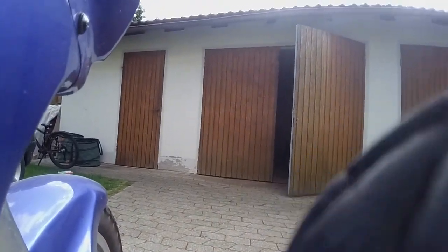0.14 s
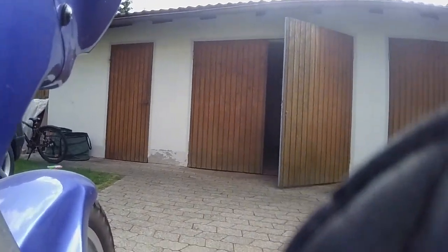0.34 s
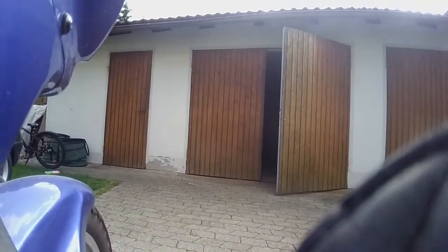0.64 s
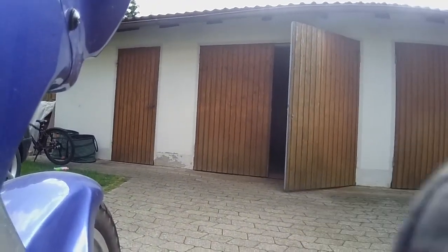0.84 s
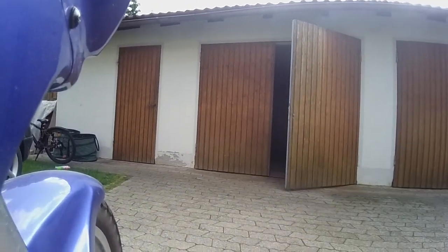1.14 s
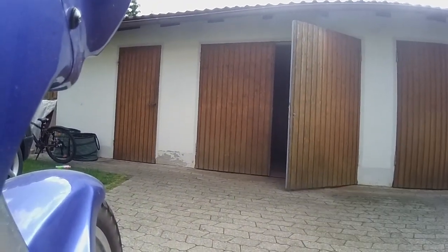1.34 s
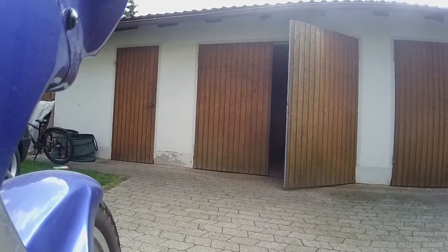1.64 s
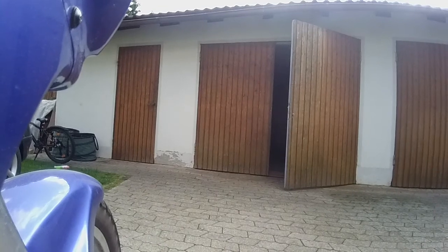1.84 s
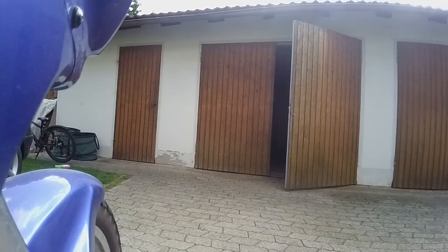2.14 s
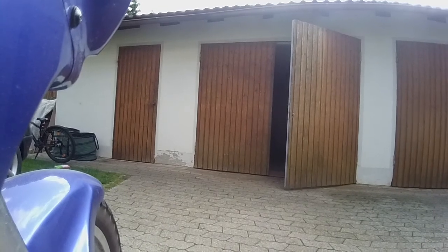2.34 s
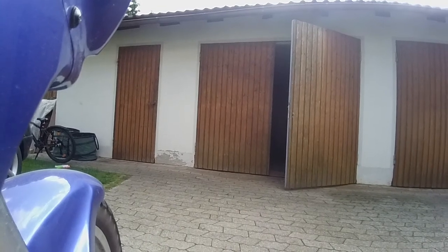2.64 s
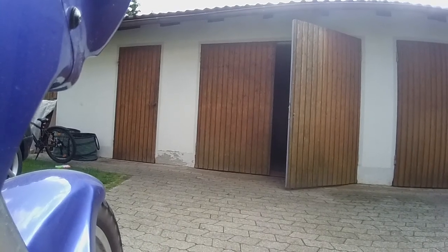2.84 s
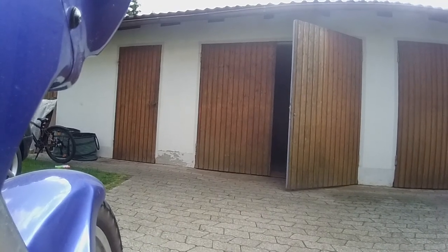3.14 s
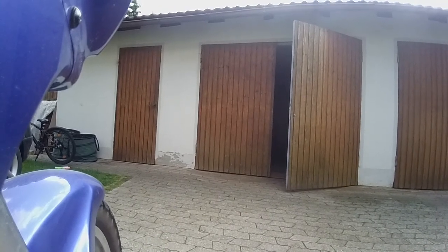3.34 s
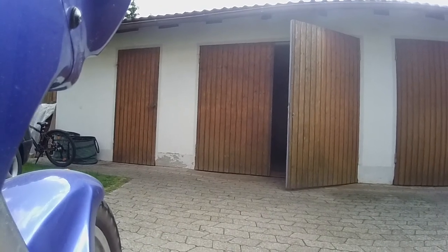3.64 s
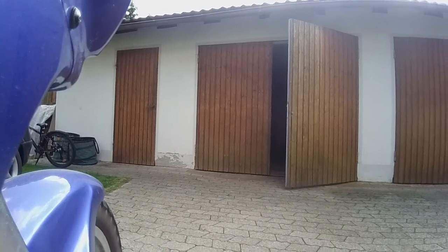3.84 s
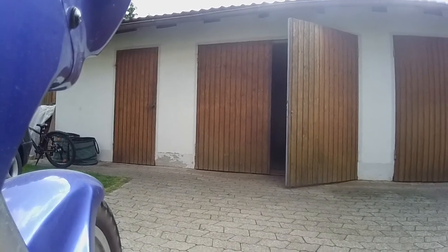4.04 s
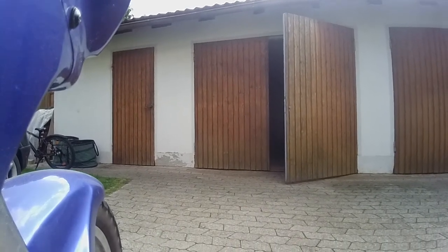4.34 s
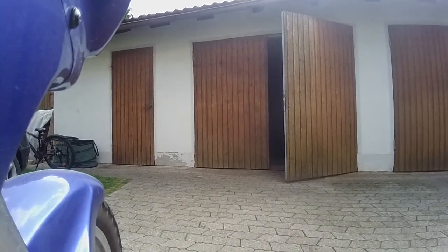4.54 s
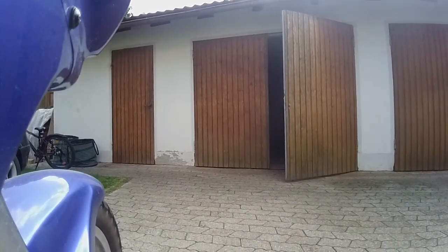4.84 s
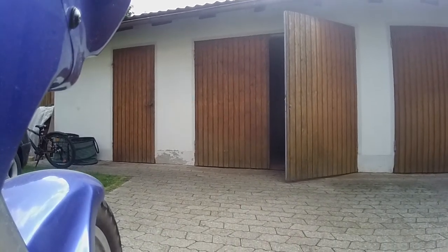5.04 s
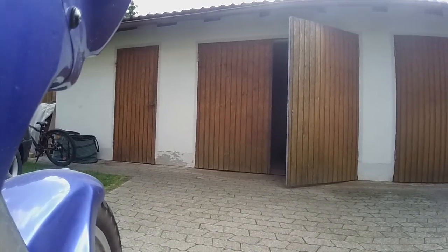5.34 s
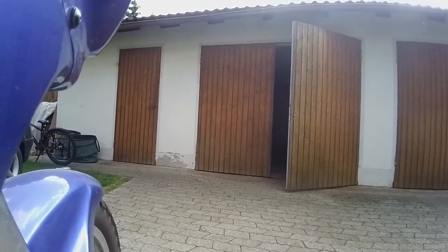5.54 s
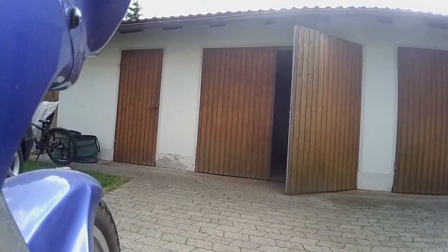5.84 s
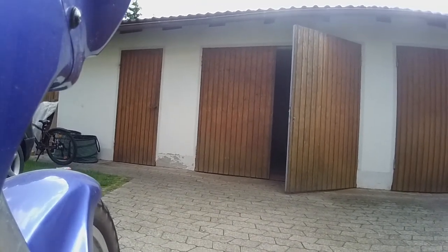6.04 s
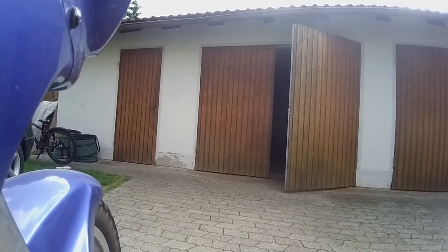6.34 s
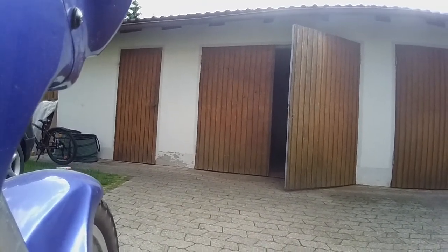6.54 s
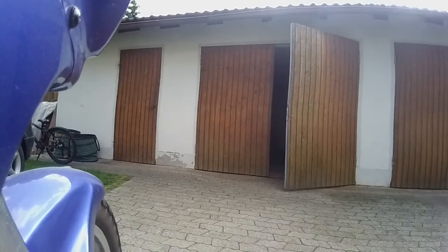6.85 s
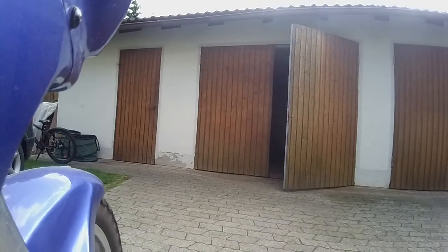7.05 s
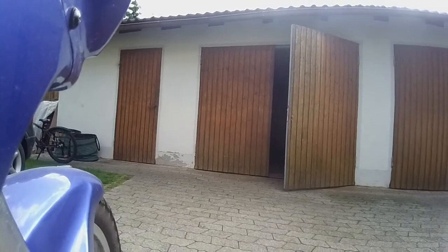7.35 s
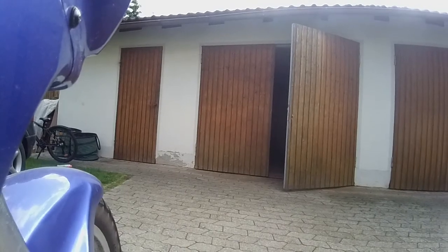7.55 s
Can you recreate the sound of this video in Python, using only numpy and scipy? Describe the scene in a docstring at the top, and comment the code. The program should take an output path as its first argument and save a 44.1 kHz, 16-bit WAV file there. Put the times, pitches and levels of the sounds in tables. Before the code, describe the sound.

A hand fumbles and bumps a camera case, a scooter frame clanks, the starter rasps, and the engine flares up, then settles into chattering idle.

```python
"""A paved courtyard: a small camera fixed low on a scooter is rubbed, pressed and knocked.
Stick-slip friction and taps excite its case; a finger now and then pops and seals its microphone port.
Blows ring the frame as decaying modes, and metal rasps and squeals at each turn of the starter.
The engine catches and sinks to idle: the faster it runs, the louder the camera chatters on its mount,
and at times the shaking chops the sound once a firing."""
import sys
import numpy as np
from scipy import signal
from scipy.fft import rfft, irfft
from scipy.io import wavfile
from scipy.ndimage import uniform_filter1d

SR = 44100
rng = np.random.default_rng(int(sys.argv[2]) if len(sys.argv) > 2 else 0)


def dump_mix(stems):
    """Bounce the given channels to the path in sys.argv[1] as a 16-bit WAV at rate SR."""
    frames = np.atleast_2d(stems).T  # one column per channel
    limited = np.clip(frames, -1, 1)  # hard clip at full scale
    pcm = np.round(limited * 32767).astype(np.int16)
    wavfile.write(sys.argv[1], SR, pcm)


N = 339570
TIME = np.arange(N) / SR  # s

# broad spectral envelope of the camera case, later scaled to unit power: (f/Hz, relative level/dB)
CASE_COLOUR = [(30, -34), (100, -14.5), (150, -14.5), (230, -4), (450, -2.5), (900, -2), (1500, -7),
               (2000, -3.5), (2600, -10.5), (3300, -14.5), (5000, -13.5), (7800, -20), (9000, -62.5)]
# broad spectral envelope of the scooter frame, later scaled to unit power: (f/Hz, relative level/dB)
FRAME_COLOUR = [(30, -28), (100, -14.5), (160, -34), (230, -1), (380, -6), (700, 2.5), (1100, 0),
                (1500, -5.5), (2800, -8.5), (3300, -15.5), (3900, -13.5), (5000, -20.5), (7500, -26.5),
                (9000, -47)]
# resonances of the frame: (f/Hz, width/Hz, lift/dB)
FRAME_RESONANCES = [(217.8, 16, 6.7), (451, 40, 5.9), (632, 34, 8.1), (960, 120, 2.2), (2000, 130, 6.3),
                    (2660, 90, 8), (3815, 95, 8.8), (3864, 34, 2)]
# a finger presses the port with a pop and keeps it shut:
# (t/s, peak level/dB, low-pass corner of the spike f/Hz, rebound relative to the peak/dB, held/s)
PORT_PRESSES = [(.457, -4, 6100, -27, 0.04), (.539, -10.5, 1500, -1.5, 0.033),
                (.571, -23.5, 1200, -10, 0.0044), (.682, -8, 2600, -4, 0.037), (.739, -13, 1800, -5, 0.12),
                (.858, -7.5, 2560, -2.5, 0.028), (1.197, -6, 890, -12.5, .021)]


def undb(db):
    """Amplitude gain from a level in decibels, by the 20 log definition."""
    return 10 ** (np.asarray(db) / 20)


def unit(x):
    """Normalisation to a root-mean-square amplitude of 1."""
    return x / np.sqrt(np.mean(x ** 2))


def add(track, s, x):
    """Linear superposition of a sound on a track from time s."""
    i = max(0, int(s * SR))
    track[i:i + len(x)] += x[:max(0, N - i)]


def filt(x, hz, kind, order=2):
    """Butterworth filtering: a maximally flat passband."""
    return signal.sosfilt(signal.butter(order, hz, kind, fs=SR, output="sos"), x)


def fade(t60):
    """Exponential decay, linear in decibels, by 60 dB in t60 seconds."""
    return undb(np.linspace(0, -60, int(t60 * SR) + 2))


def wobble(hz):
    """Low-pass random process of spread 1 that changes about hz times a second."""
    return unit(filt(rng.standard_normal(N), hz, "low"))


def body(x, colour, peaks=(), tilt_db=0, size=4096):
    """Source-filter principle: a force drives a minimum-phase body of unit power gain."""
    hz = np.maximum(np.fft.rfftfreq(size, 1 / SR), 1)
    knots, levels = np.transpose(colour)
    envelope_db = np.interp(np.log(hz), np.log(knots), levels)
    # the tilt, in dB per octave, acts above 550 Hz
    db = envelope_db + tilt_db * np.log2(np.maximum(hz, 550))
    for centre, width, lift in peaks:
        db = db + lift / (1 + (2 * (hz - centre) / width) ** 2)
    # folding the cepstrum makes the body ring only after it is pushed
    cepstrum = irfft(np.log(undb(db)))
    cepstrum[1:size // 2] *= 2
    cepstrum[size // 2 + 1:] = 0
    response = irfft(np.exp(rfft(cepstrum)))
    return signal.fftconvolve(x, response / np.linalg.norm(response))[:N]


def ring(modes, split=0.01):
    """Modal superposition: one second of freely decaying modes, each a close pair that beats."""
    t = TIME[:SR]
    out = np.zeros(SR)
    for hz, db, t60 in modes:
        partner_hz = hz * (1 + split * rng.standard_normal())
        pair = np.sin(2 * np.pi * hz * t) + .5 * np.sin(2 * np.pi * partner_hz * t)
        out += undb(db) * np.exp(-np.log(1000) * t / t60) * pair
    return out / np.sqrt(2)


def crack(t60, rise_s=0.0011):
    """Impact excitation: rattling contact as decaying noise; the parts take a moment to meet."""
    decay = fade(t60)
    decay = decay * (1 - np.exp(-TIME[:len(decay)] / rise_s))
    return unit(rng.standard_normal(len(decay))) * decay


def friction(strokes, crest, swell_db, bend, colour, peaks, grain_db, catch_db, catch_hz, song):
    """Stick-slip friction: tiny slips, bunched as surfaces catch, drive a body under a song's tone."""
    bunching_db = grain_db * wobble(2700) + catch_db * wobble(catch_hz)
    slips = unit(rng.standard_normal(N) * undb(bunching_db))
    out = np.zeros(N)
    for start, length, db, tilt in strokes:
        during = (TIME >= start) & (TIME < start + length)
        progress = (TIME[during] - start) / length
        # 0 at the crest, 1 at both ends; the crest is round if bend > 1, pointed below
        ease = np.interp(progress, [0, np.clip(crest, 0, 1), 1], [1, 0, 1])
        pressure = undb(db - swell_db * ease ** bend)
        add(out, start, body(unit(slips[during]) * pressure, colour, peaks, tilt))
        add(out, start, song[during] * pressure)
    return out


def churn(x, depth_db, hz):
    """Band-wise amplitude modulation: the contact point moves, so each band swells and fades alone."""
    out = 0
    for edge in np.geomspace(500, 6000, num=7):
        low = signal.sosfiltfilt(signal.butter(4, edge, fs=SR, output="sos"), x)
        out = out + low * undb(depth_db * wobble(hz))
        x = x - low
    return out + x


def air(air_db=-58, rumble_db=-61):
    """Broadband noise: a faint outdoor hush, and a low rumble while the hand rests on the camera."""
    # spectral envelope of the hush, later scaled to unit power: (f/Hz, relative level/dB)
    yard_colour = [(30, -24), (60, -21.5), (90, -12), (150, -11.5), (260, -4.5), (650, -1.5), (1000, -1.5),
                   (1500, -8.5), (3000, -11), (8000, -18.5), (9000, -46)]
    hush = body(rng.standard_normal(N), yard_colour) * undb(air_db + 1.2 * wobble(14))
    resting = np.interp(TIME, [3.5, 3.6], [1, 0])
    rumble = unit(filt(rng.standard_normal(N), [12, 36], "band")) * resting
    return hush + undb(rumble_db) * rumble


def courtyard(x, damp_hz=3500):
    """Diffuse reverberation: convolution with the echo of walls and wooden doors, dull in the treble."""
    t60_s, wet_db = 1, -28.5
    tail = filt(crack(t60_s), [170, damp_hz], "band", order=1)
    tail[:SR // 60] = 0  # silent until the first reflections
    return undb(wet_db) * signal.fftconvolve(x, tail / np.linalg.norm(tail))[:N]


def rattles(tilt_db=-1.2):
    """Random impacts: loose parts touch the frame lightly at uneven moments while the scooter rocks."""
    start, end = 4.95, 6.08  # s
    per_s, level_db, scatter_db, t60_s = 24, -41.5, 3.5, 0.1
    force = np.zeros(N)
    for when, size in rng.random((int(per_s * (end - start)), 2)):
        touch_db = level_db + scatter_db * (2 * size - 1)
        add(force, start + when * (end - start), undb(touch_db) * crack(t60_s))
    return body(force, FRAME_COLOUR, FRAME_RESONANCES, tilt_db)


def frame():
    """Impulsive modal excitation: blows rattle the panels and ring the frame; the stand's spring twangs."""
    # blows on the scooter's frame: (t/s, level/dB, brightness/(dB/octave), t60/s)
    knocks = [(4.355, -46, -7, .15), (4.557, -42, -7, 0.076), (4.666, -19.5, 2.5, 0.13),
              (4.736, -18, 1, 0.088), (4.755, -3.5, 1, 0.14), (4.774, -2, -3, 0.13),
              (4.834, -4.5, 0, 0.098), (4.893, -14, -3, 0.06), (5.164, -31.5, -2, .12),
              (5.275, -21, -2, .062), (5.647, -29, -4.5, 0.093), (6.733, 1, 6.5, 0.031),
              (7.204, -10, -5, 0.05), (7.348, -9.5, -2.5, .12), (7.41, -3.5, -.7, .12),
              (7.494, -5.5, -3, .12), (7.575, -10.5, -3, 0.067), (7.627, -1, -7, 0.018)]
    # ringing modes of the frame: (f/Hz, relative level/dB, t60/s)
    frame_modes = [(93.4, -26.5, 0.66), (213, -11.5, .55), (446, -15, .45), (618, -9, 0.56),
                   (1314, -22, 0.32), (2605, -18, 1), (2900, -30, .4)]
    # ringing modes of the stand's spring: (f/Hz, relative level/dB, t60/s)
    spring_modes = [(584, -13, .16), (980, 3.5, 0.81), (1120, -6, 0.19), (1484, 1, 0.26), (1960, 4, 0.16),
                    (2612, 0.5, 0.33), (3790, -12, 0.41), (4570, 4.5, 0.12), (5350, -6, .15)]
    twang_s, twang_db = 4.664, -23
    # ringing left by a blow of this length; a longer one leaves more
    ring_db, ring_t60_s = -16.5, 0.094
    out, tubes = np.zeros(N), ring(frame_modes)
    add(out, twang_s, undb(twang_db) * ring(spring_modes))
    for s, db, tilt, t60 in knocks:
        add(out, s, undb(db) * body(crack(t60), FRAME_COLOUR, FRAME_RESONANCES, tilt))
        add(out, s, undb(db + ring_db) * t60 / ring_t60_s * tubes)
    return out


def stutter(count=7):
    """Stick-slip oscillation: a fingertip's evenly spaced slips, each louder and brighter than the last."""
    start_s, period_s, sliding_share = 1.225, .0186, 0.66
    first_db, growth_db, brighten_db = -44, 5, 0.35  # steps per slip: dB, and dB/octave
    return [(start_s + k * period_s, sliding_share * period_s, first_db + k * growth_db, k * brighten_db)
            for k in range(count)]


def hand():
    """Friction and impact on a plastic shell: the hand rubs and taps the camera case."""
    # strokes of the hand over the camera: (t/s, length/s, crest level/dB, brightness/(dB/octave))
    rubs = [(.148, 0.043, -32.5, -3), (.185, 0.09, -28, -1), (.257, .02, -20, -2.3),
            (.275, 0.083, -34, 0.8), (.364, .046, -34.5, 2), (.413, .016, -34, 4), (.44, .02, -44, 4),
            (.887, .042, -29, 2.5), (.936, 0.17, -19, 1), (1.135, 0.016, -35, 0.5),
            (1.495, 0.042, -22.5, 0.5), (1.535, .07, -25, -1), (1.68, 0.22, -39, -1.5),
            (2.17, .14, -44.5, -1.5), (2.4, 0.4, -55, -0.5), (2.853, .095, -24, -1),
            (3.341, 0.038, -36.5, -2.5), (3.394, .236, -26, -2), (3.54, 0.15, -24.5, 1),
            (3.675, .11, -31, 0), (3.78, .105, -44.5, -5), (4.2, 0.26, -56, -1), (5.745, 0.059, -41, 0.2),
            (5.91, .12, -39.5, -3.5)]
    # taps on the case: (t/s, level/dB, brightness/(dB/octave))
    taps = [(.003, -20, -.5), (.149, -19.5, -3), (.296, -9.5, -1), (.654, -31, -3), (.808, -24, -2),
            (.907, -29, 8), (.914, -42, 18), (.946, -42, 12), (1.192, -13, -5), (1.496, -16, -.5),
            (1.52, -27, 10), (1.563, -12, .5), (2.314, -27, -4.5), (2.423, -35.5, -1.5), (2.501, -32, -8),
            (2.909, -3.5, .5), (3.342, -22, -4), (3.396, -19, -3.5), (3.868, -33, 1), (5.532, -29.5, 1.5)]
    # resonances of the case: (f/Hz, width/Hz, lift/dB)
    case_resonances = [(609, 58, 8.5), (1033, 155, 7.5), (2655, 120, 6), (2930, 270, 10), (3808, 276, 12.5),
                       (7050, 360, 11)]
    # a loose grip lets the hollow case groan under the rubbing: (t/s, level relative to the stroke/dB)
    groan_levels = [(3.33, -25), (3.4, -2.5), (3.55, 2.5), (3.62, -32)]
    groan_db = np.interp(TIME, *np.transpose(groan_levels))
    groan = unit(filt(rng.standard_normal(N), [570, 680], "band")) * undb(groan_db)
    # each stroke presses hardest at 0.53 of its length, 11 dB above its ends
    rubbing = friction(rubs + stutter(), 0.53, 11, 1.62, CASE_COLOUR, case_resonances,
                       grain_db=2.5, catch_db=1.34, catch_hz=100, song=groan)
    out = churn(rubbing, depth_db=1.4, hz=24)
    for s, db, tilt in taps:
        contact = crack(0.025, rise_s=0.00039)
        add(out, s, undb(db) * body(contact, CASE_COLOUR, case_resonances, tilt))
    return out


def port_pops(leak_hz=260, rebound_s=0.00202, thud_db=-33, thud_hz=900, thud_t60=.1):
    """Pressure transient: a spike leaks away, the membrane rebounds and rings, and the case thuds dully."""
    out = np.zeros(N)
    for s, db, hz, rebound_db, _ in PORT_PRESSES:
        spike = filt(filt(signal.unit_impulse(SR // 20), hz, "low"), leak_hz, "high", order=1)
        membrane_modes = [(1020, 1.0, 0.014), (598, -11.0, 0.022), (2460, -12, 0.012)]
        rebound = ring(membrane_modes, split=0.28)
        thud = filt(body(crack(thud_t60), CASE_COLOUR), thud_hz, "low", order=4)
        add(out, s, undb(db) * spike / spike.max())
        add(out, s + rebound_s, -undb(db + rebound_db) * rebound)
        add(out, s, undb(db + rebound_db + thud_db) * thud)
    return out


def starter(waver=0.02498, flicker_db=1.5):
    """Friction-driven tone: metal rasps and squeals unsteadily, its harmonics flickering separately."""
    # turns of the starter, each a surge of rasping: (t/s, length/s, crest level before a 3 dB cut/dB)
    rasps = [(6.129, .125, -15), (6.218, .18, -5), (6.378, .095, -11.5), (6.46, .125, -13.5),
             (6.57, .135, -5.5)]
    # spectral envelope of the rasping metal, later scaled to unit power: (f/Hz, relative level/dB)
    starter_colour = [(30, -38), (140, -22), (230, -7.5), (380, -9), (800, -2), (1500, -6.5), (2900, -11.5),
                      (3280, -27.5), (3700, -7.5), (4300, -29), (5600, -22), (6300, -44), (7000, -25),
                      (9000, -79)]
    # resonances of the rasping metal: (f/Hz, width/Hz, lift/dB)
    starter_resonances = [(627, 19, 10.5), (942, 155, 8.2), (1940, 84, 17.1), (2642, 110, 12),
                          (3720, 150, 8.1), (4016, 140, 13.6), (4600, 160, 15)]
    # course of the squeal, about which its pitch wavers: (t/s, f/Hz)
    squeal_pitch = [(6.3, 969), (6.36, 742.5), (6.41, 934), (6.62, 967), (6.67, 885)]
    # harmonics of the squeal from the fundamental up: (mean level relative to the rasp/dB)
    harmonics_db = [-3, -14.5, -16, -21]
    hz = np.interp(TIME, *np.transpose(squeal_pitch)) * (1 + waver * wobble(110.3))
    phase = 2 * np.pi * np.cumsum(hz) / SR
    squeal = np.zeros(N)
    for k, db in enumerate(harmonics_db, 1):
        squeal += undb(db + flicker_db * wobble(30)) * np.sin(k * phase)
    # a harder turn is brighter: 3 dB/octave at 0 dB, and 0.34 dB/octave less per dB below
    turns = [(s, length, db, 3 + 0.34 * db) for s, length, db in rasps]
    # each turn peaks at 0.58 of its length, 17.5 dB above its ends
    rasp = friction(turns, 0.58, 17.5, 0.85, starter_colour, starter_resonances,
                    grain_db=2.0, catch_db=1.5, catch_hz=112, song=squeal)
    return churn(rasp, depth_db=2.5, hz=25.2) / np.sqrt(2)


def port_ticks(contact, per_s=700, scatter_db=0.5):
    """Random impulse train: hard bounces snap the port's membrane, and die away as the engine settles."""
    start_s, hold_s, level_db, fall_db_per_s = 6.735, 0.3, -24, 122
    # membrane's spectral envelope: (f/Hz, relative level/dB)
    membrane = [(1000, -7.0), (5000, -3.5), (7100, 12.0), (8000, 4.5), (9000, -57)]
    hardness = np.sqrt(contact / uniform_filter1d(contact, SR // 25))
    snaps = (rng.random(N) < per_s / SR) * undb(scatter_db * rng.standard_normal(N)) * hardness
    db = level_db - fall_db_per_s * np.maximum(TIME - start_s - hold_s, 0)
    return unit(body(snaps, membrane)) * undb(db) * (TIME > start_s)


def engine(outside, chatter_db=6.0, chatter_hz=300, thump_db=-19, hum_db=-25.5, second_db=-44):
    """Periodic forcing with amplitude modulation: firings shake the camera, which chatters on its mount."""
    # engine speed: (t/s, firing rate f/Hz)
    speed = [(6.62, 60), (6.71, 81), (6.76, 86), (6.83, 96), (6.96, 80), (7.05, 57), (7.19, 48), (7.5, 47),
             (7.61, 55), (7.7, 56)]
    # spells in which the shaking chops the sound: (t/s, length/s, half the depth/dB)
    chop_spells = [(6.655, .115, 6.5), (7.12, .09, 3), (7.592, .15, 13)]
    # spectral envelope of the mount, later scaled to unit power: (f/Hz, relative level/dB)
    mount_colour = [(30, -34.5), (90, -13.5), (160, -14), (230, -2), (400, -2), (650, -0.5), (1100, -2),
                    (1600, -10), (2800, -14.5), (3300, -18), (3900, -19), (4800, -27.5), (7800, -40),
                    (9000, -67)]
    idle_hz, idle_db, rev_db_per_octave = 48.3, -22.5, 12  # the engine is louder the faster it runs
    catch_s, treble_db = 0.049, 0.2  # time to come to life; lift of the clatter's treble
    hz = np.interp(TIME, *np.transpose(speed))
    db = idle_db + rev_db_per_octave * np.log2(hz / idle_hz)
    running = np.clip((TIME - speed[0][0]) / catch_s, 0, 1)
    turn = 2 * np.pi * (np.cumsum(hz) - hz.sum()) / SR  # one firing per 2 pi

    half_depth_db = np.zeros(N)
    for s, length, depth in chop_spells:
        half_depth_db += depth * ((TIME > s) & (TIME < s + length))
    half_depth_db = uniform_filter1d(half_depth_db, SR // 50)
    chop = undb(half_depth_db * (np.tanh(2 * np.cos(turn)) - 1))

    bounce = undb(chatter_db * np.tanh(wobble(chatter_hz)))
    force = chop * unit(bounce * rng.standard_normal(N))
    cycle = np.floor(turn / (2 * np.pi))
    firings = unit(np.diff(cycle, prepend=cycle[0]))
    shaking = (force + undb(thump_db) * firings) * undb(db) * running
    clatter = body(shaking, mount_colour, FRAME_RESONANCES)
    dull = filt(clatter, 1900, "low", order=1)
    clatter = dull + (clatter - dull) * undb(treble_db)

    hum = undb(db + hum_db) * np.sin(turn) + undb(second_db) * np.sin(2 * turn)
    hum = running * hum * undb(2.3 * wobble(8))
    return chop * outside + clatter + port_ticks(chop * bounce) + hum


def scene(sealed_db=-24, muffled_hz=700, muffled_db=-9):
    """Transmission through an aperture: the finger shuts the port after each press; a muffled rest remains."""
    seal_lag_s = 0.0081  # from the pop until the port is shut
    scooter = frame() + starter() + rattles()
    port = np.ones(N)
    for s, *_, held in PORT_PRESSES:
        shut = s + seal_lag_s
        port[(TIME > shut) & (TIME < shut + held)] = undb(sealed_db)
    port = uniform_filter1d(port, SR // 600)
    outside = engine(scooter + courtyard(scooter)) + air() + hand()
    muffled = undb(muffled_db) * filt(outside, muffled_hz, "low")
    return (outside * port + muffled * (1 - port) + port_pops())[None]


def record(dry):
    """Band limiting and clipping: a narrow-band microphone whose loudest peaks clip."""
    mic_hz, top_hz = 8150, 16000  # low-pass edges before and after clipping
    narrow = signal.sosfilt(signal.ellip(10, .2, 70, mic_hz, fs=SR, output="sos"), dry)
    clipped = np.clip(narrow, -1, 1)
    return signal.sosfilt(signal.ellip(8, .2, 70, top_hz, fs=SR, output="sos"), clipped)


dry = scene()
out = record(dry)
dump_mix(out)
```